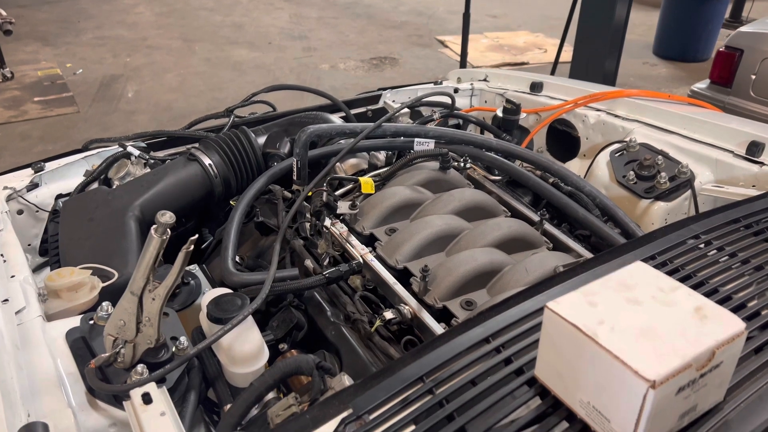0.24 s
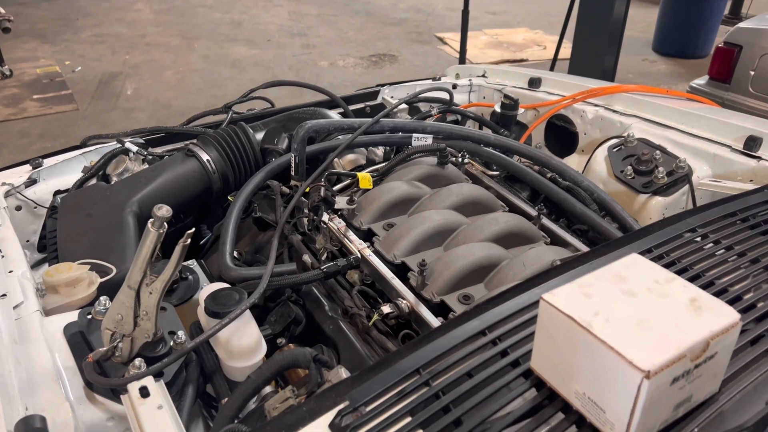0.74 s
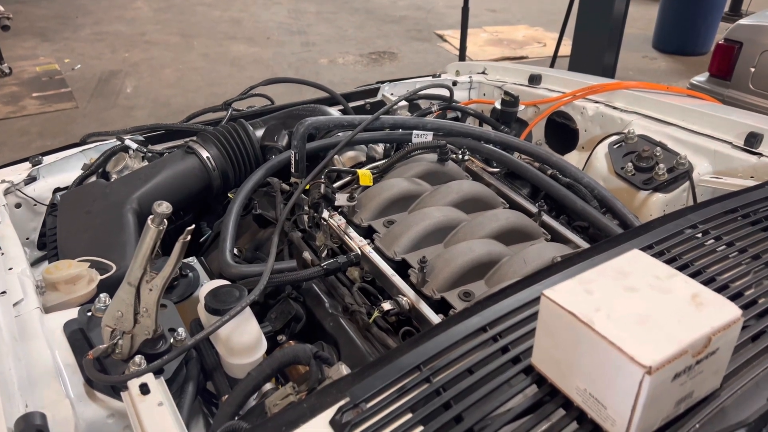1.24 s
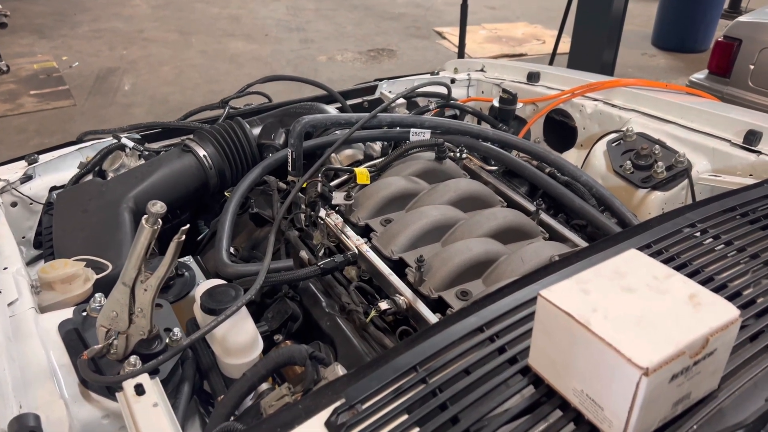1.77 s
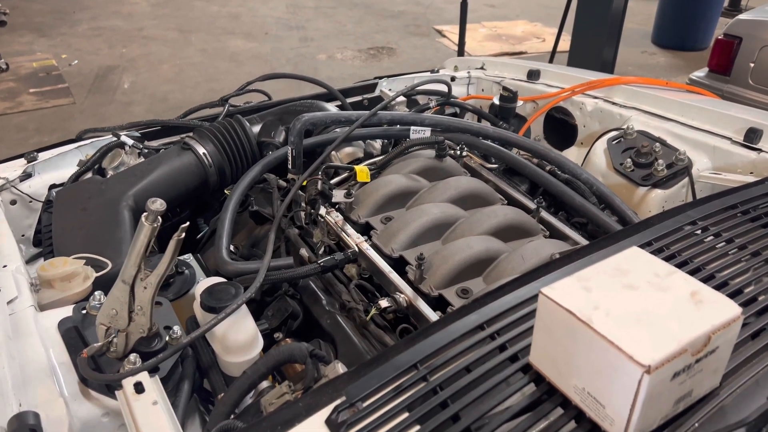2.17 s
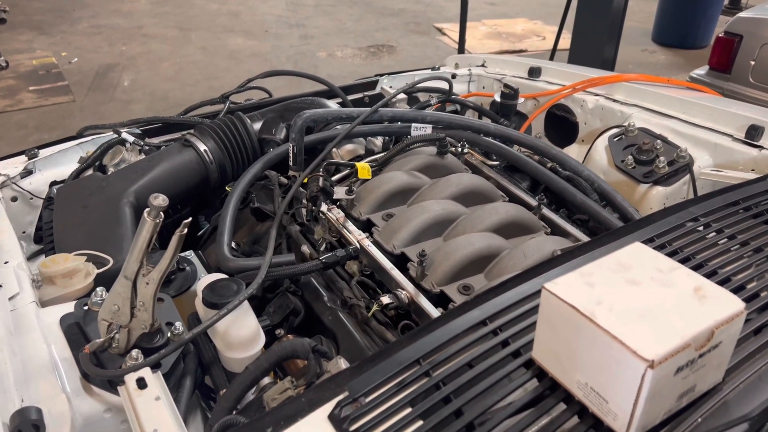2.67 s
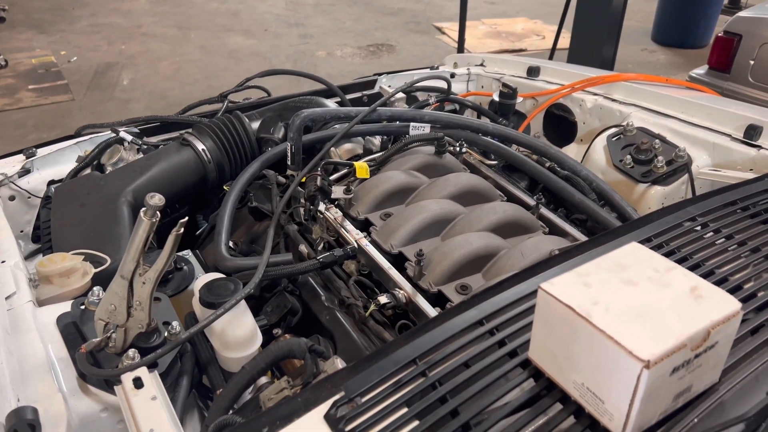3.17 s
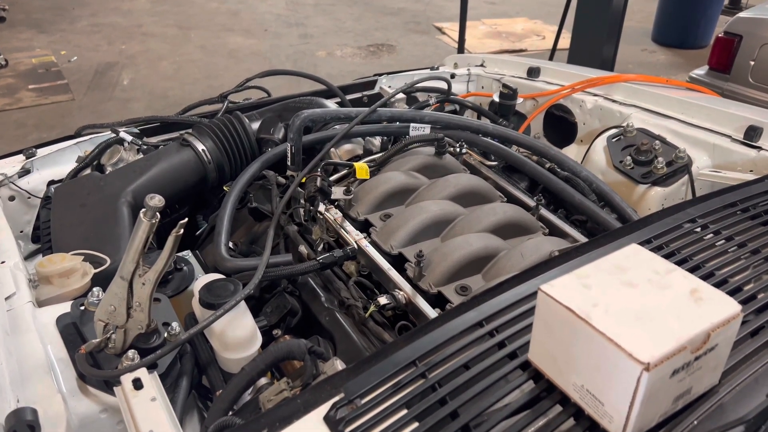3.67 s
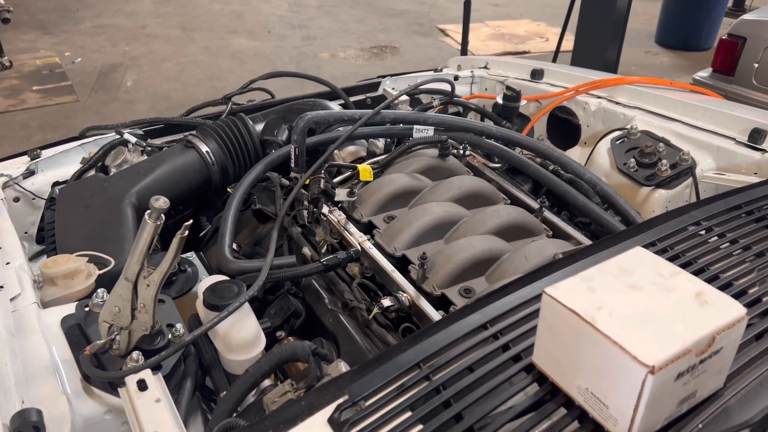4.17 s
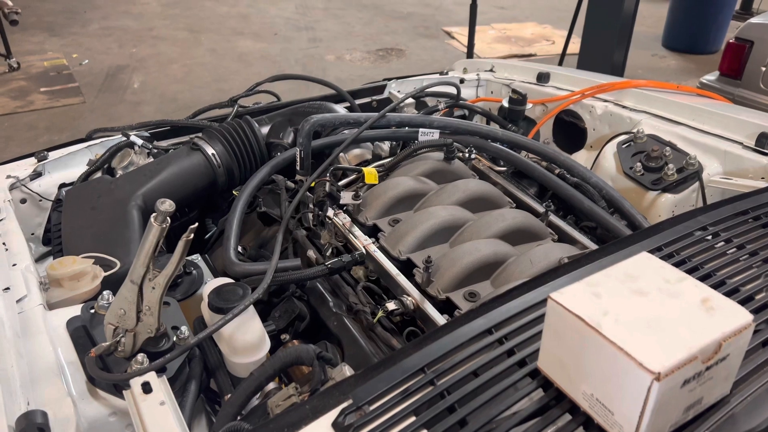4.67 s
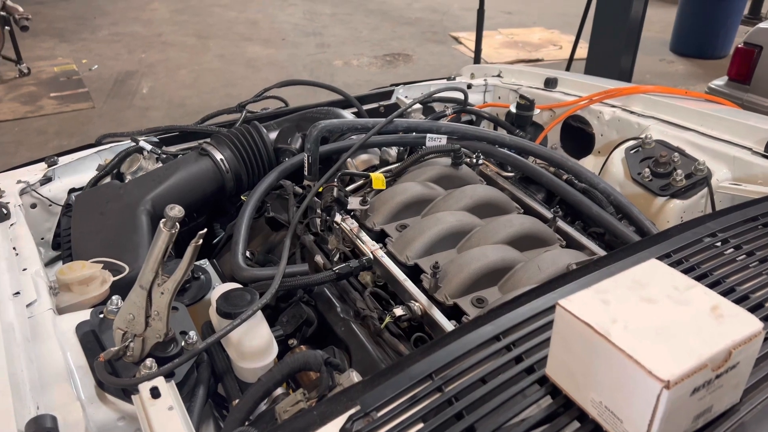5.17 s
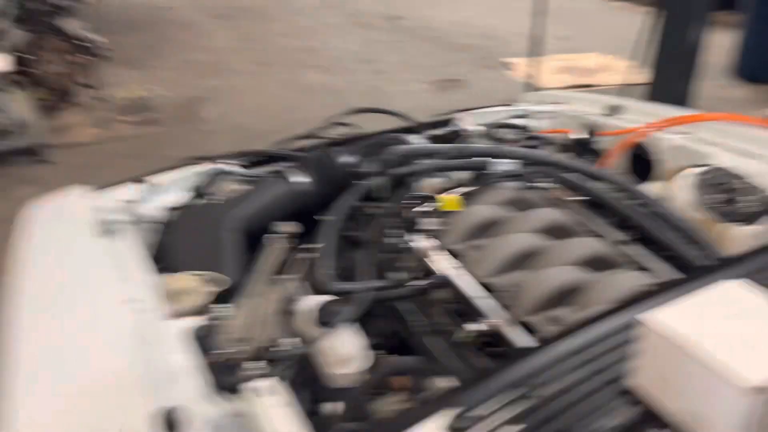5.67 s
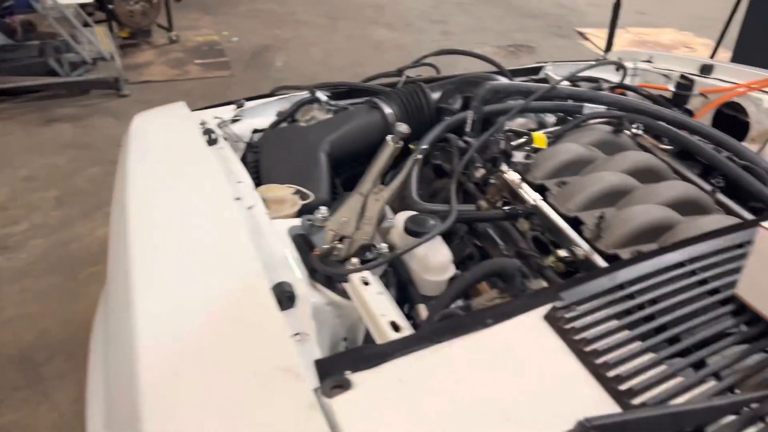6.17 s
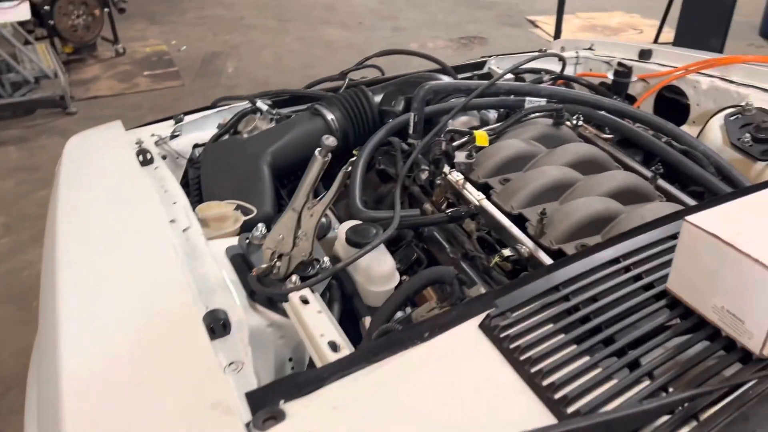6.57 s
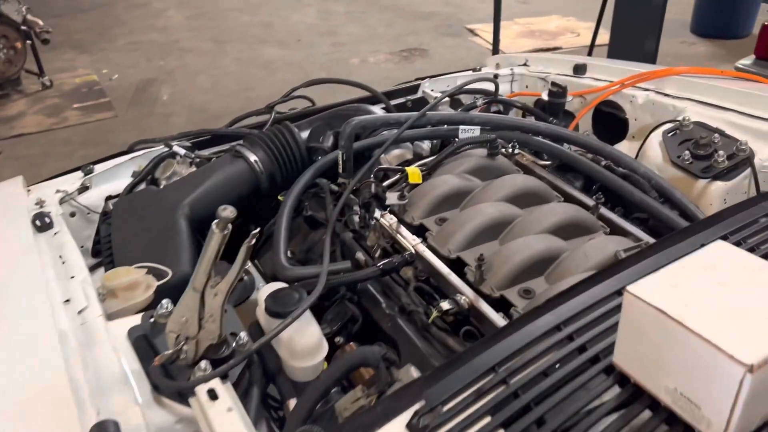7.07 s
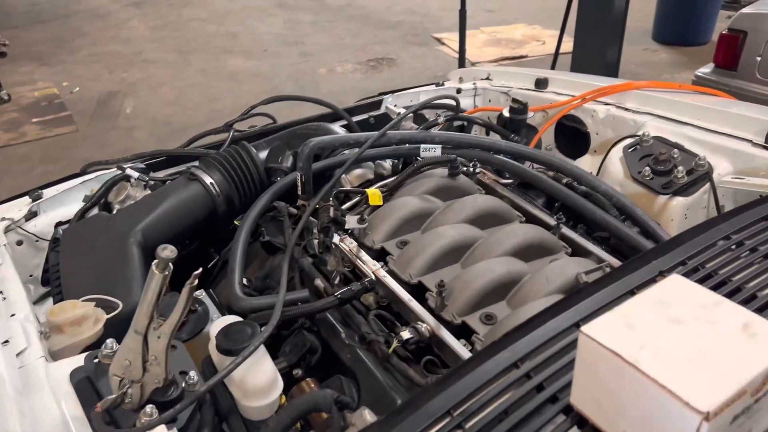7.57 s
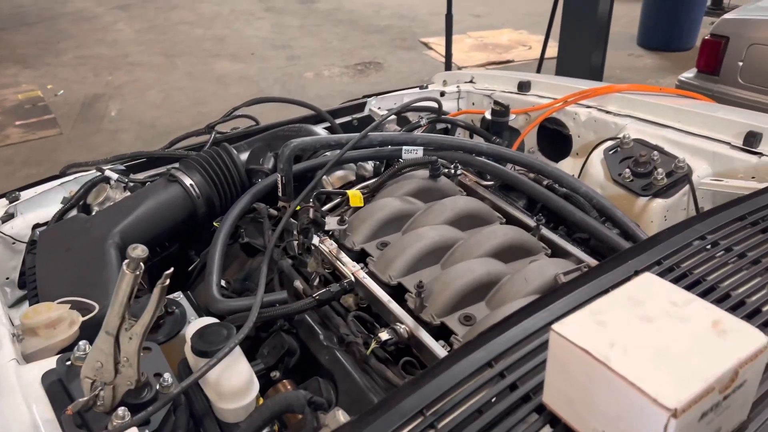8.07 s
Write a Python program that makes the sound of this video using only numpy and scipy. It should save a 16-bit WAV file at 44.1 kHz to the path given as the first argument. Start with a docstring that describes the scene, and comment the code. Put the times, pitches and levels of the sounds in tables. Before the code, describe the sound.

A handheld phone hears a large engine being cranked: a metallic slam, then regular grinding surges over soft exhaust throbs, with bright ticks and dry valve clacks. A short, louder burst of uneven booms and rattles marks a failed start. Faint falling whistles fade into low garage noise and isolated dull knocks, before a second slam and a cut-off moment of cranking.

```python
"""A V8 in a garage is cranked by its starter, catches for a moment, dies, and is cranked again.
Each stroke loads the starter gear, shaped noise that surges, and makes exhaust, housing and gear case sing.
Gliding sines give the booming exhaust pipes and the starter's whines as it turns and coasts down.
Injector ticks, valve clacks and knocks are short blows on resonances, over faint garage noise and hum.
A phone held over the bay hears it all through two ports."""
import sys
import numpy as np
from scipy import signal
from scipy.fft import rfft, irfft
from scipy.io import wavfile
from scipy.ndimage import uniform_filter1d

SR = 44100
rng = np.random.default_rng(int(sys.argv[2]) if len(sys.argv) > 2 else 0)


def store_wav(level_fs):
    """Save 16-bit WAV to argv[1]."""
    pcm = np.round(np.clip(np.atleast_2d(level_fs), -1, 1) * 32767)
    wavfile.write(sys.argv[1], SR, pcm.T.astype(np.int16))


N = 366912
TIME = np.arange(N) / SR
FREQ = np.maximum(np.arange(N // 2 + 1) * SR / N, 1.)

# crank angle, one list per attempt: (time [s], angle [engine cycles of two turns])
CRANK = [
    [(.346, -.854), (.438, -.723), (.593, -.589), (.694, -.469), (.778, -.349), (1.0142, 0), (1.6559, 1),
     (2.297, 2), (2.9467, 3), (3.6003, 4), (4.2542, 5), (4.9096, 6), (5.23, 6.49)],
    [(8.166, .146), (8.238, .277), (8.32, .33)],
]
# whirr of the pinion on the ring gear while they mesh: (time [s], level [dB])
MESH = [(.3, -79), (.7, -43.5), (5.2, -43.5), (5.3, -58)]
# injector ticks: (time [s], level [dB])
TICKS = [(0.4852, -15.5), (0.7759, -14.5), (1.0134, -13), (1.2145, -14), (1.431, -13), (1.6566, -13),
         (1.8521, -15), (2.0691, -13.5), (2.297, -12), (2.4956, -15), (2.717, -13.5), (2.947, -13.5),
         (3.1476, -15.5), (3.3691, -13.5), (3.6, -13.5), (3.802, -16), (4.0237, -13.5), (4.2544, -14),
         (4.4556, -15.5), (4.6787, -13.5), (4.9103, -13.5), (5.1107, -17), (5.2724, -14), (5.3353, -22.5),
         (5.3794, -27), (5.4152, -24), (5.504, -21), (5.594, -21), (5.66, -21.5), (5.7653, -22),
         (8.3114, -18.5)]
# valve-gear clacks: (time [s], level [dB])
CLACKS = [(0.667, -20.5), (1.1112, -19.5), (1.328, -22.5), (1.749, -21), (1.9718, -21), (2.39, -20.5),
          (2.62, -22), (3.0422, -22.5), (3.2715, -22), (3.697, -19), (3.9255, -22), (4.352, -22.5),
          (4.58, -23), (5.0038, -21.5), (5.2327, -17.5), (5.294, -19.5), (5.3798, -24), (5.464, -23.5),
          (5.507, -33), (5.573, -29.5), (5.596, -27), (5.625, -27), (5.661, -34), (5.7136, -29),
          (5.7674, -32), (5.837, -33.5)]


def undb(db):
    """Decibels to gain."""
    return 10 ** (np.asarray(db) / 20)


def unit(x):
    """Scale to rms 1."""
    return x / np.sqrt(np.mean(x ** 2))


def over_hz(table):
    """A (Hz, value) table on the frequency axis, straight between points in log frequency."""
    hz, value = np.transpose(table)
    return np.interp(np.log(FREQ), np.log(np.maximum(hz, 1.)), value)


def coloured(spectrum):
    """Noise of rms 1 with a (Hz, dB) spectrum."""
    return unit(irfft(rfft(rng.standard_normal(N)) * undb(over_hz(spectrum)), N))


def ring(x, modes):
    """Causal resonances (Hz, width Hz, dB), scaled together to unit power on white noise."""
    gain = sum(undb(db) / np.sqrt(width) / (1 + 1j * (FREQ / hz - hz / FREQ) * hz / width)
               for hz, width, db in modes)
    return irfft(rfft(x) * gain / np.sqrt(np.mean(np.abs(gain) ** 2)), N)


def bursts(times, peaks_db, rise_s, fall_s):
    """Envelope that rises and dies away at each time."""
    starts = np.zeros(N)
    np.add.at(starts, np.minimum(np.asarray(times) * SR, N - 1).astype(int), undb(peaks_db))
    t = TIME[:SR // 2]
    shape = (1 - np.exp(-t / rise_s)) ** 2 * np.exp(-t / fall_s)
    return signal.fftconvolve(starts, shape / shape.max())[:N]


def pushes(times, db):
    """Envelope that comes on quickly, sags while the stroke pushes and lets go."""
    lead_s, rise_s, sag_s = 0.0033, .005, .05
    push_s, release_s = 0.04, 0.0045
    starts = np.zeros(N)
    np.add.at(starts, np.minimum((times - lead_s) * SR, N - 1).astype(int), undb(db))
    t = TIME[:SR // 10]
    shape = (1 - np.exp(-t / rise_s)) ** 2 * np.exp(-t / sag_s)
    shape /= 1 + np.exp((t - push_s) / release_s)
    return signal.fftconvolve(starts, 0.98 * shape / shape.max())[:N]


def curve_gain(s, db):
    """A level curve, silent outside its span."""
    return undb(np.interp(TIME, s, db, left=-150, right=-150))


def flicker(rate, depth_db):
    """Gain that wanders at random, drawn anew rate times a second."""
    k = int(SR / rate)
    steps = np.repeat(rng.standard_normal(N // k + 1), k)
    return undb(depth_db * uniform_filter1d(steps, k)[:N])


def tone(table, multiple=1):
    """A sine that follows a (s, Hz, dB) curve."""
    s, hz, db = np.transpose(table)
    phase = 2 * np.pi * multiple * np.cumsum(np.interp(TIME, s, hz)) / SR
    return np.sqrt(2) * curve_gain(s, db) * np.sin(phase)


def running(column):
    """Level course of one running noise over both attempts."""
    # one list per attempt: (time [s], gear whirr [dB], air hiss [dB], exhaust rumble [dB], top sizzle [dB])
    attempts = [
        [(0.25, -62, -62, -64, -95), (0.32, -43, -38.5, -48, -86), (0.4, -34, -38.5, -47.5, -55),
         (0.76, -33.5, -38, -40.5, -50.5), (1.1, -32.5, -37, -41.5, -50), (5.17, -34.5, -38.5, -42, -53),
         (5.23, -39, -39, -37, -50), (5.316, -35.5, -44, -21.5, -44), (5.36, -36, -39, -25.5, -41),
         (5.39, -43, -40, -27, -49), (5.468, -43, -42.5, -38, -49), (5.644, -41, -43, -33.5, -49.5),
         (6.004, -51, -51, -42, -63.5), (6.204, -59.5, -59, -50.5, -72), (6.6, -63.5, -62, -56, -75),
         (7.0, -69.5, -70, -66.5, -99), (7.35, -81.5, -89.5, -80, -110)],
        [(8.1, -67, -74, -78.5, -103), (8.168, -41, -40, -45, -59), (8.288, -37.5, -43.5, -50, -56),
         (8.32, -36, -47, -51, -68)],
    ]
    return sum(curve_gain(np.array(t)[:, 0], np.array(t)[:, column]) for t in attempts)


def cycle():
    """Place in the engine cycle (0-1) during the long attempt."""
    return np.interp(TIME, *np.transpose(CRANK[0])) % 1


def strokes():
    """Rows (s, gear surge dB, body mode dB ..): each cylinder as the crank reaches it, then fired strokes, by time."""
    # the cylinders in order: (place in the cycle [0-1], gear surge [dB], then level of each body mode [dB])
    cylinders = [(.031, -26, -38, -44, -46, -41, -52, -44, -33, -46, -38, -44, -40, -44, -39, -42),
                 (.146, -24, -29, -45, -44, -32, -38, -42, -31, -38, -32, -41, -37, -40, -46, -50),
                 (.277, -27, -38, -48, -41, -49, -50, -44, -33, -48, -37, -43, -41, -37, -44, -43),
                 (.409, -29, -42, -56, -34, -45, -54, -50, -32, -45, -36, -43, -38, -45, -43, -49),
                 (.531, -28, -40, -52, -35, -46, -54, -54, -30, -37, -46, -39, -43, -44, -43, -45),
                 (.651, -24, -39, -47, -44, -35, -40, -34, -32, -44, -36, -38, -41, -46, -38, -46),
                 (.776, -27, -38, -41, -44, -44, -39, -54, -33, -42, -35, -41, -38, -45, -41, -47),
                 (.892, -29, -33, -49, -40, -37, -56, -58, -29, -44, -34, -45, -37, -46, -39, -49)]
    # strength of the cranked strokes: (time [s], gear surge [dB], body [dB])
    effort = [(.35, -19, -14), (0.502, -23, -10), (.72, -5, -13), (.8, -2, 1), (1.3, -1, -0.6),
              (2.5, -7, 0.7), (5.2, -0.5, -1.5), (8.169, -23, -11), (8.241, -15, -9)]
    # strokes while the engine catches and dies: (time [s], gear surge [dB], body [dB])
    firings = [(5.232, -15, -33), (5.296, -18.5, -19.5), (5.332, -17.5, -21.5), (5.38, -38.5, -31.5),
               (5.4137, -28, -32), (5.464, -40, -29.5), (5.5072, -51, -25), (5.575, -32, -22.5),
               (5.624, -24, -35.5), (5.661, -48, -44), (5.7127, -55, -48), (5.7677, -36, -43),
               (5.8362, -41, -38), (5.8933, -37, -31), (5.9764, -37, -44), (6.1993, -54, -44)]
    # share of each body mode in a fired stroke: level [dB]
    fired_db = [-3.5, -3.5, -13.5, -21.5, -13.5, -16, -33, -18, -22, -22, -20, -23.5, -13, -21]
    rows = [(s, surge_db, *(body_db + np.array(fired_db))) for s, surge_db, body_db in firings]
    when, surge_effort, body_effort = np.transpose(effort)
    for s, angle in map(np.transpose, CRANK):
        for turn in range(int(np.floor(angle[0])), int(angle[-1]) + 1):
            for place, surge_db, *modes_db in cylinders:
                if angle[0] - .02 < turn + place < angle[-1]:
                    t = np.interp(turn + place, angle, s)
                    surge = surge_db + np.interp(t, when, surge_effort)
                    modes = np.array(modes_db) + np.interp(t, when, body_effort)
                    rows.append((t, surge, *modes))
    return np.transpose(sorted(rows))


def garage():
    """Low room noise with a steady hum and a thin electric whine with overtones."""
    # room noise: (frequency [Hz], level [dB])
    room_spectrum = [(13, -47), (30, -31.5), (46, -3.5), (91, -10), (122, -3.5), (151, -23.5), (181, -14),
                     (315, -30), (906, -34.5), (980, -28.5), (1180, -34.5), (1900, -34.5), (2600, -38),
                     (4200, -43.5), (5890, -38.5), (9300, -53.5), (12000, -70), (15600, -85.5),
                     (22000, -120)]
    # slow course of the room noise: (time [s], level [dB])
    room_level = [(0, 1), (.25, 7), (6.5, 0), (7.2, 1.5), (7.5, 1.2), (8.32, 1.5)]
    # electric whine: (time [s], level [dB])
    whine_level = [(5.899, -65), (6.2, -69), (6.62, -65), (6.7, -73), (7.7, -77), (7.85, -93), (8.1, -94)]
    # its overtones: (multiple of the base note, level [dB])
    overtones = [(5, -81), (6, -89), (7, -86)]
    # course of the overtones: (time [s], level [dB])
    overtone_level = [(0, -3), (7.3, 0), (8.1, -7), (8.32, -7)]
    hum_hz, whine_hz = 118.7, 1000.4
    hum = undb(-59) * np.sin(2 * np.pi * hum_hz * TIME) * flicker(13, 3.0)
    whine = np.sin(2 * np.pi * whine_hz * TIME) + .4 * np.sin(4 * np.pi * whine_hz * TIME)
    whine *= curve_gain(*np.transpose(whine_level)) * flicker(20, 2.5)
    tops = sum(undb(db) * np.sin(2 * np.pi * k * whine_hz * TIME) * flicker(20, 3.0) for k, db in overtones)
    tops *= curve_gain(*np.transpose(overtone_level))
    room = undb(-57) * curve_gain(*np.transpose(room_level)) * coloured(room_spectrum) * flicker(2.4, 1.1)
    return room + hum + whine + tops


def knocks():
    """Dull knocks and clinks around the car: narrow-band noise, each with its own pitch and ring."""
    # blows: (time [s], level [dB], pitch [Hz], t60 [s], upper modes [dB])
    knock_table = [(.198, -46, 450, .12, -4), (.212, -56, 1700, .05, -2), (.220, -46, 800, .09, 0),
                   (.220, -50, 1900, .05, -1), (5.268, -21, 250, .12, -5), (5.264, -24, 540, .12, -4),
                   (5.296, -26, 500, .12, -3), (5.578, -28, 230, .1, -4), (5.570, -31, 1120, .07, -4),
                   (5.602, -35, 1000, .07, -2), (6.200, -42, 280, .15, -10), (6.570, -45, 477, .15, -15),
                   (6.634, -50, 500, .12, -12), (6.727, -43, 730, .1, -6), (6.727, -49, 1000, .08, -1),
                   (6.727, -58, 1900, .08, -1), (6.745, -49, 480, .2, -14), (7.218, -54, 1780, .22, 0),
                   (7.225, -59, 1810, .6, -5), (7.770, -62, 1100, .1, -1), (7.770, -63, 1550, .15, -1),
                   (7.815, -62, 1550, .3, -3), (7.921, -56, 750, .08, -3), (7.921, -61, 1200, .08, -2),
                   (8.052, -48, 474, .15, -14), (8.050, -62, 7500, .08, -30)]
    # modes of a knock: (share of pitch, width as share of pitch)
    knock_modes = [(1, .05), (1.14, .07), (1.32, .1)]
    out, t = np.zeros(N + SR), TIME[:SR // 2]
    for s, db, hz, t60, upper_db in knock_table:
        blow = undb(db - 6) * (1 - np.exp(-t / .0015)) ** 2 * np.exp(-t * np.log(1000) / t60)
        start = int((s - .003) * SR)
        for k, (share, width) in enumerate(knock_modes):
            peak = signal.iirpeak(share * hz, share / width, fs=SR)
            once = signal.lfilter(*peak, rng.standard_normal(SR))
            noise = signal.lfilter(*peak, once)[SR // 2:]  # the filters have settled by here
            out[start:start + len(t)] += blow * unit(noise) * undb(upper_db * (k > 0))
    return out[:N]


def starter():
    """The gear train rattles and surges as each compression loads it; the meshing teeth whirr."""
    # gear rattle: (frequency [Hz], level [dB])
    gear_spectrum = [(88, -31.5), (150, -13), (203, -6.5), (310, -6.5), (420, -8), (560, -11), (760, -5.5),
                     (835, -7), (930, -8.5), (1060, -6), (1200, -2.5), (1500, -4), (2440, -17.5),
                     (3490, -17), (4000, -39.5), (5200, -47.5), (8800, -120)]
    # whirring gear modes: (frequency [Hz], width [Hz], level [dB])
    gear_modes = [(3513, 69, 10.5), (2856, 33, -6), (3110, 63, -6.5), (4055, 35, -7), (3780, 32, -3.5),
                  (1550, 27, -5), (2200, 50, -12.5), (3500, 120, -23.5), (2675, 60, -5), (5300, 97, 2.5),
                  (5470, 53, 0.5)]
    slack_db, slack_until_s = -7, 5.1
    s, surge_db = strokes()[:2]
    loaded = np.clip(pushes(s - .004, 0 * s), 0, 1)
    # the rattle is weaker between strokes than under load
    slack = undb(slack_db * (0.5 - loaded) * (TIME < slack_until_s))
    surge = pushes(s + 0.0009, surge_db - 25)
    take_up = bursts(s - .001, surge_db - 17.5, 0.00087, 0.0034)  # knock as the teeth take up their slack
    teeth = coloured(gear_spectrum) * flicker(120, 1.2) * (running(column=1) * slack + surge + take_up)
    whirr = ring(rng.standard_normal(N), gear_modes) * curve_gain(*np.transpose(MESH))
    return teeth + whirr * flicker(30, 3.5) * undb(1.1 * loaded - 1.1)


def intake():
    """Air in the intake hisses along and swells a little with the load."""
    # hiss: (frequency [Hz], level [dB])
    hiss_spectrum = [(900, -29), (1500, -4), (4000, -5.5), (7000, -7.5), (9000, -10), (11000, -49.5)]
    s, surge_db = strokes()[:2]
    return coloured(hiss_spectrum) * flicker(60, 1.56) * (running(column=2) + pushes(s, surge_db - 22))


def sizzle():
    """Flickering high noise that runs along with the starter."""
    # sizzle: (frequency [Hz], level [dB])
    sizzle_spectrum = [(7000, -29), (9000, -31), (11800, 16.5), (13500, -7.5), (16000, 2.5), (17000, -41.5)]
    return coloured(sizzle_spectrum) * flicker(40, 1.3) * running(column=4)


def whines():
    """Whines of the meshing teeth, which bend down at each compression and waver."""
    # tooth whines: (frequency [Hz], level [dB])
    tooth_lines = [(2820, 3), (3080, 0), (3280, -16.5), (3400, -8), (3530, -1), (3770, -9), (4190, -10.5)]
    load_sag = 0.018  # share by which they drop under load
    s = strokes()[0]
    speed = 1 - load_sag * uniform_filter1d(np.clip(pushes(s, 0 * s), 0, 1), SR // 40)
    lines = np.zeros(N)
    for hz, db in tooth_lines:
        phase = 2 * np.pi * np.cumsum(hz * speed * flicker(60, .12)) / SR
        lines += undb(db) * np.sin(phase) * flicker(40, 3.5)
    return undb(-4) * curve_gain(*np.transpose(MESH)) * lines


def rumble():
    """Rough low flow noise in the exhaust, which swells once an engine cycle."""
    # rumble: (frequency [Hz], level [dB])
    rumble_spectrum = [(15, -55), (36, -11), (48, -5.5), (87, -2.5), (110, -6.5), (136, -9), (255, -16.5),
                       (350, -21), (677, -27.5), (900, -33), (1170, -60), (1980, -120)]
    swing_db, loudest_place = 2, 0.043  # place in the cycle, 0-1
    swell = undb(swing_db * np.cos(2 * np.pi * (cycle() - loudest_place)))
    return undb(7.5) * coloured(rumble_spectrum) * running(column=3) * swell * flicker(25, 1.9)


def slam():
    """The pinion slams into the ring gear: a broad noise burst with ringing gear modes."""
    # slams: (time [s], level [dB])
    engage = [(0.274, -16.5), (8.129, -19.5)]
    # blow: (frequency [Hz], level [dB])
    slam_spectrum = [(88, -34), (150, -1), (759, -2.5), (979, 0), (2360, -5), (2600, -6.5), (8560, -15),
                     (12200, -19.5), (14000, -23), (16000, -31.5)]
    # ringing: (frequency [Hz], width [Hz], level [dB])
    slam_modes = [(1000, 50, 6), (2190, 54, -1), (2900, 99, 4), (3470, 42, 5)]
    s, db = np.transpose(engage)
    noise = coloured(slam_spectrum) + 0.56 * ring(rng.standard_normal(N), slam_modes)
    return noise * bursts(s - .015, db - 9, 0.013, 0.025)


def groans():
    """Housing and exhaust groan: each groan swells, slides in pitch and fades."""
    # while the engine gathers speed and catches: (middle [s], start [Hz], end [Hz], level [dB], length [s])
    groan_table = [(0.309, 210, 201, -42, .08), (.40, 860, 840, -38, .04), (0.421, 575, 594, -43, 0.074),
                   (0.432, 295, 284, -42, 0.046), (.45, 838, 834, -37, .06), (.465, 464, 450, -40, .05),
                   (0.486, 656, 623, -41.5, .04), (0.503, 400, 385, -40, 0.093),
                   (.50, 192, 207, -38, 0.091), (0.577, 683, 670, -38, 0.04), (0.593, 617, 600, -39, 0.046),
                   (0.614, 319, 297, -36.5, 0.085), (.625, 847, 840, -34.5, 0.049),
                   (0.634, 560, 575, -41, 0.046), (0.651, 665, 687, -39, .06), (.67, 520, 520, -46, 0.037),
                   (0.702, 289, 284, -42.5, 0.13), (0.707, 1398, 1410, -31, 0.047),
                   (0.716, 650, 647, -40, 0.057), (5.273, 4930, 4800, -34.5, 0.018),
                   (5.318, 247.5, 254, -25, 0.071), (5.324, 663, 690, -41.5, 0.049),
                   (5.4, 261, 252, -33, 0.062), (5.452, 697, 670, -40.5, 0.05),
                   (5.468, 254, 243, -35.5, 0.039), (5.52, 460, 440, -41, 0.052),
                   (5.602, 253, 261, -29.5, 0.059), (5.613, 1060, 1066, -40, 0.064),
                   (5.625, 709, 700, -40, .06), (5.674, 284, 280, -37, .09), (5.716, 1040, 1024, -43, .04),
                   (5.861, 247, 245, -36, 0.043), (5.976, 260, 263, -43, 0.034)]
    out = np.zeros(N)
    for s, hz, end_hz, db, length in groan_table:
        u = np.linspace(0, 1, int(length * SR))
        start = int((s - length / 2) * SR)
        slide = np.sin(2 * np.pi * np.cumsum(hz + (end_hz - hz) * u) / SR)
        out[start:start + len(u)] += undb(db) * np.sqrt(2) * np.sin(np.pi * u) * slide
    return out * flicker(70, 0.84)


def booms():
    """Single booms of an exhaust pipe: each swells and fades on one note."""
    # while the engine gathers speed, catches and dies: (middle [s], note [Hz], level [dB], length [s])
    boom_table = [(.33, 92, -45, 0.11), (0.465, 70.5, -22.5, 0.047), (0.522, 90, -31.5, 0.14),
                  (0.642, 62.5, -23, 0.21), (0.616, 99, -26, 0.077), (0.694, 104, -28.5, 0.08),
                  (0.771, 63, -23.5, 0.057), (0.846, 64.5, -25, 0.12), (0.806, 92, -26, 0.054),
                  (5.299, 101, -16.5, 0.089), (5.348, 75.3, -20, 0.11), (5.411, 87.5, -16, 0.064),
                  (5.49, 76.3, -15.5, 0.12), (5.514, 99, -19, 0.15), (5.589, 99, -15, 0.078),
                  (5.625, 76.7, -16.5, 0.14), (5.682, 99.5, -15, 0.061), (5.744, 78.8, -24, 0.099),
                  (5.78, 99, -18.5, 0.11), (5.868, 77.3, -22, 0.16), (5.87, 97, -18.5, 0.072),
                  (5.959, 82, -18.5, 0.059), (6.04, 80, -34, 0.072), (6.126, 78, -30.5, 0.093),
                  (6.216, 81, -32.5, 0.11)]
    out = np.zeros(N)
    for s, hz, db, length in boom_table:
        swell = np.cos(np.pi * np.clip((TIME - s) / length, -.5, .5))
        out += np.sqrt(2) * undb(db) * swell * np.sin(2 * np.pi * hz * TIME)
    return out


def singing(s, hz, scatter, db):
    """A mode that sounds while each stroke pushes, a little off pitch each time and sagging as the shaft slows."""
    stroke = np.clip(np.searchsorted(s, TIME + 0.0094) - 1, 0, None)
    sag = 1 - .3 * np.clip(TIME - s[stroke], 0, .08)
    detune = 1 + scatter * rng.standard_normal(len(s))[stroke]
    phase = 2 * np.pi * np.cumsum(hz * sag * detune) / SR
    return np.sin(phase) * pushes(s + 0.0024, db) * flicker(60, 1.07)


def body():
    """Each stroke makes exhaust, housing and gear case sing in shares that depend on the cylinder."""
    # exhaust, bell-housing and gear-case modes: frequency [Hz]
    body_hz = [205, 256, 406, 436, 522, 666, 845, 1150, 1246, 1325, 1428, 1525, 1685, 2045]
    # random spread of each mode's pitch from stroke to stroke: share of its pitch
    body_scatter = [.035, .04, .015, .015, .04, .025, .006, .006, .005, .008, .008, .01, .008, .003]
    stroke_scatter_db = 1.5
    s, _, *modes_db = strokes()
    out = np.zeros(N)
    for hz, scatter, db in zip(body_hz, body_scatter, modes_db):
        out += singing(s, hz, scatter, db + stroke_scatter_db * rng.standard_normal(len(s)))
    return out


def injectors():
    """Hiss of the needle lifting and seating again a moment later; the bay smears both."""
    # hiss resonances: (frequency [Hz], width [Hz], level [dB])
    tick_modes = [(6460, 350, 2.5), (5100, 350, -2), (5710, 540, -0.5), (11240, 370, -0.5),
                  (7980, 570, -5.5), (14100, 1800, -24), (3290, 450, -4), (1616, 1060, 5.5)]
    s, db = np.transpose(TICKS)
    lift = bursts(s - .0005, db - 13, 0.0009, 0.0024)
    seat = bursts(s + 0.0072, db - 20.0, 0.00054, 0.0021)
    smear = bursts(s, db - 22.5, 0.0018, 0.023)
    hiss = ring(rng.standard_normal(N) * (lift + seat + smear), tick_modes)
    return hiss * (TIME > s[0] - .01)


def needles():
    """The lifting needle rings the same modes at every tick; the low ones build up later."""
    # needle modes: (frequency [Hz], level [dB], t60 [s])
    needle_modes = [(1350, -5, .03), (2150, -1, .022), (3300, -9, .022), (3680, -12, .022),
                    (4350, -14, .015), (4900, -6, .017), (5690, -9, .018), (6810, 2.5, .011),
                    (7650, -12, .015), (8300, -11, .015), (8850, -13, .018), (9380, -13, .018),
                    (11100, -4, .014), (11680, -6, .017), (12720, -10, .017), (14700, -14, .018),
                    (15600, -13, .018)]
    rise_cycles = 5.9
    s, db = np.transpose(TICKS)
    hits, t = np.zeros(N), TIME[:SR // 20]
    hits[((s - .0006) * SR).astype(int)] = undb(db - 2)
    shape = np.zeros(len(t))
    for hz, share_db, t60 in needle_modes:
        envelope = (1 - np.exp(-t * hz / rise_cycles)) ** 2 * np.exp(-t * np.log(1000) / t60)
        shape += undb(share_db) * envelope * np.sin(2 * np.pi * hz * t)
    return signal.fftconvolve(hits, shape / np.abs(shape).max())[:N]


def valves():
    """Dry noise clacks from the valve gear, and a loose rattle of them as the engine dies."""
    # clack: (frequency [Hz], level [dB])
    clack_spectrum = [(300, 2.5), (600, 13.5), (1500, 3), (2500, 3), (6000, -9.5), (9000, -36.5)]
    s, db = np.transpose(CLACKS)
    return coloured(clack_spectrum) * bursts(s - .0007, db - 3, .0003, .005)


def blows():
    """The first contact of each clack rings the cylinder head."""
    # head modes: (frequency [Hz], width [Hz], level [dB])
    clack_modes = [(640, 300, -6), (1400, 450, 4), (2500, 500, -1), (3060, 290, -4.5)]
    s, db = np.transpose(CLACKS)
    hits = np.zeros(N)
    hits[(s * SR).astype(int)] = undb(db + 0.5)
    return ring(hits, clack_modes)


def pipe(table):
    """A pipe note that goes through the same rise and fall in every cycle."""
    # course of the pipe notes around steady cranking: (time [s], level [dB])
    steady = [(.88, -24), (.97, -1), (2., 0.5), (3., -1.1), (5.22, -1.5), (5.3, -26)]
    place, hz, db = np.transpose(table)
    hz, db = (np.interp(cycle(), place, v, period=1) for v in (hz, db))
    level = np.sqrt(2) * undb(db) * curve_gain(*np.transpose(steady)) * flicker(17, 1)
    return level * np.sin(2 * np.pi * np.cumsum(hz) / SR)


def coasting():
    """Two faint, broken whistles that fall with the starter's speed, and thin low ones that hardly fall."""
    # the freed starter whines down: (time [s], pitch [Hz], upper whistle [dB], lower whistle [dB])
    coast = [(5.9, 13600, -99, -80), (5.97, 12600, -99, -70), (6.07, 11100, -99, -80),
             (6.15, 10200, -90, -72), (6.2, 9700, -74, -71), (6.36, 7900, -75, -73), (6.44, 6900, -86, -78),
             (6.5, 6200, -76, -88), (6.62, 5300, -79, -95), (6.8, 4100, -94, -99), (6.9, 3500, -99, -99)]
    # thin low whistle: (time [s], pitch [Hz], level [dB])
    low_line = [(5.95, 1480, -80), (6.1, 1470, -68), (6.65, 1455, -69), (6.8, 1420, -90)]
    # its notes: (share of pitch, level [dB])
    low_shares = [(1, -3), (.86, -5), (.5, -4)]
    partner = .675  # pitch of the lower falling whistle as a share of the upper
    rows = np.array(coast)
    upper = tone(rows[:, :3]) * flicker(40, 4)
    lower = tone(rows[:, [0, 1, 3]], partner) * flicker(40, 4)
    falling = (upper + lower) * flicker(400, 6) / 1.1
    thin = sum(undb(db) * tone(low_line, share) * flicker(25, 3.5) * flicker(150, 2.4)
               for share, db in low_shares)
    return falling + thin


def ports(shared, scattered):
    """Two ports hear one part alike but shifted in phase, and a scattered part with opposite sign."""
    # likeness of the two ports: (frequency [Hz], likeness [0-1])
    likeness = [(30, .96), (120, .93), (250, .9), (500, .55), (1000, .25), (2200, .3), (4000, .08),
                (8000, .6), (13000, .75)]
    # balance: (frequency [Hz], left minus right [dB])
    balance = [(60, -.8), (250, -.3), (500, 1), (700, 1), (1290, 6.5), (2380, -1.5), (3600, 6), (4400, 9),
               (5400, 8), (8120, .5), (15000, .2)]
    # phase by which left leads: (frequency [Hz], lead [radians])
    phase_lead = [(60, .1), (150, .05), (690, 0.3), (1400, 1.47), (3500, 1.06), (6700, 0.99), (12000, 1.6)]
    alike = np.clip(over_hz(likeness), 0, 1)
    a = rfft(shared) * np.sqrt((1 + alike) / 2)
    b = rfft(scattered) * np.sqrt((1 - alike) / 2)
    tilt = undb(over_hz(balance) / 2) * np.exp(.5j * over_hz(phase_lead))
    return np.array([irfft((a + b) * tilt, N), irfft((a - b) / tilt, N)])


def noises():
    """One path's draw of the noisy sources, whines and whistles."""
    engine = starter() + intake() + sizzle() + whines() + rumble() + slam()
    return garage() + knocks() + engine + injectors() + valves() + coasting()


def scene():
    """Noisy sources reach the ports by two unrelated paths; notes, body modes and rung blows by the shared one."""
    # the two lowest pipe notes through one steady cycle: (place in the cycle [0-1], note [Hz], level [dB])
    low_pipe = [(0, 68.37, -24.5), (.07, 69.66, -18), (.2, 66.6, -26), (.28, 69.2, -25.5),
                (.32, 69.15, -39), (.37, 65.96, -22.5), (.42, 62.16, -28.5), (.48, 62.9, -25),
                (.59, 62.74, -24.5), (.645, 62.87, -44), (.7, 68, -26), (.74, 66.46, -30), (.8, 68.7, -26),
                (.9, 68.7, -27.5), (.96, 65.3, -17.5)]
    high_pipe = [(0, 87.7, -43.5), (.08, 89.65, -40), (.12, 87.5, -42.5), (.17, 86.52, -27.5),
                 (.27, 86.3, -28), (.35, 87.22, -39), (.41, 98.8, -24.5), (.445, 102.9, -36.5),
                 (.475, 101.7, -26.5), (.51, 100.8, -35.5), (.555, 95.96, -22.5), (.61, 94.1, -30),
                 (.65, 94, -26), (.72, 87.4, -39), (.79, 88.2, -33.5), (.86, 87, -30), (.93, 87.7, -43),
                 (.97, 88.8, -40.5)]
    notes = groans() + booms() + body() + needles() + blows() + pipe(low_pipe) + pipe(high_pipe)
    shared, scattered = noises(), noises()
    return ports(shared + notes, scattered)


def record(dry):
    """The phone rounds the loudest peaks and cuts the top."""
    top_hz = 16800
    low_pass = signal.ellip(8, .2, 70, top_hz, fs=SR, output="sos")
    return signal.sosfilt(low_pass, np.tanh(1.5 * dry) / 1.5)


dry = scene()
out = record(dry)
store_wav(out)
```